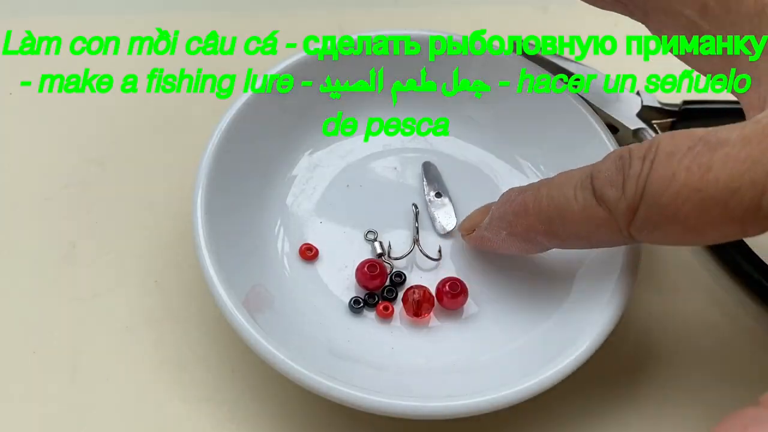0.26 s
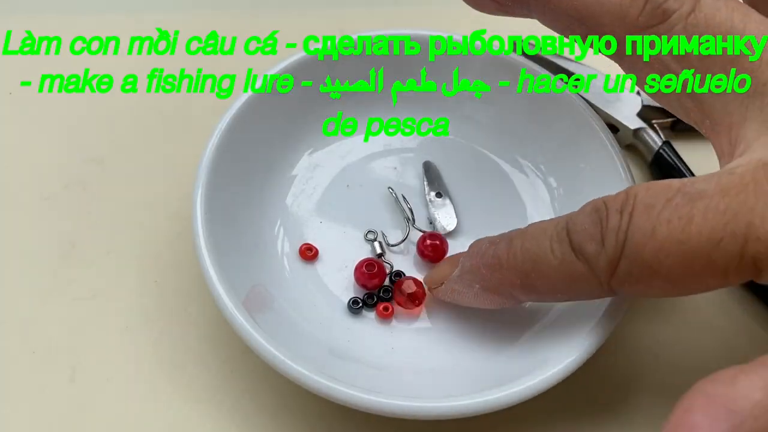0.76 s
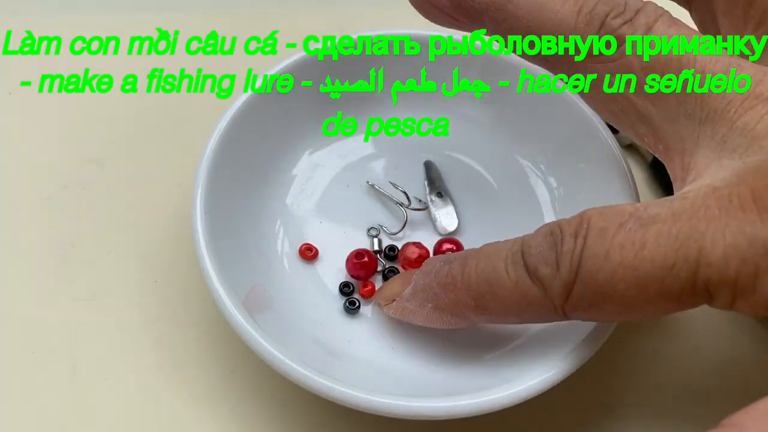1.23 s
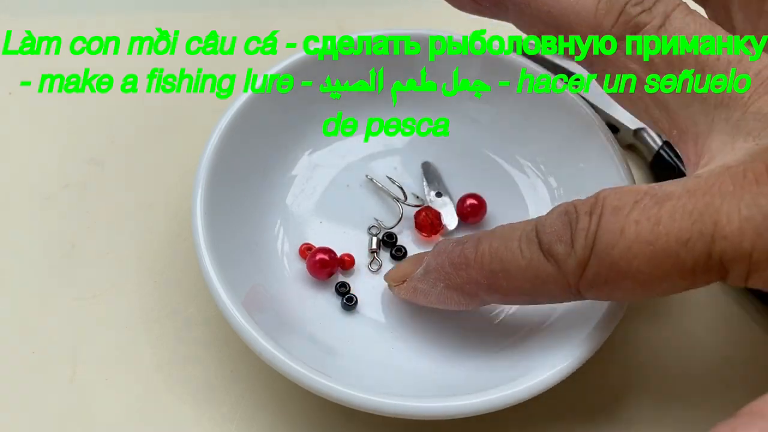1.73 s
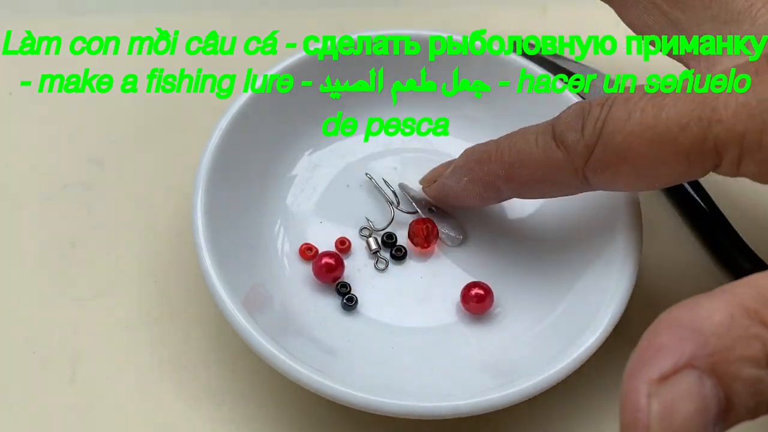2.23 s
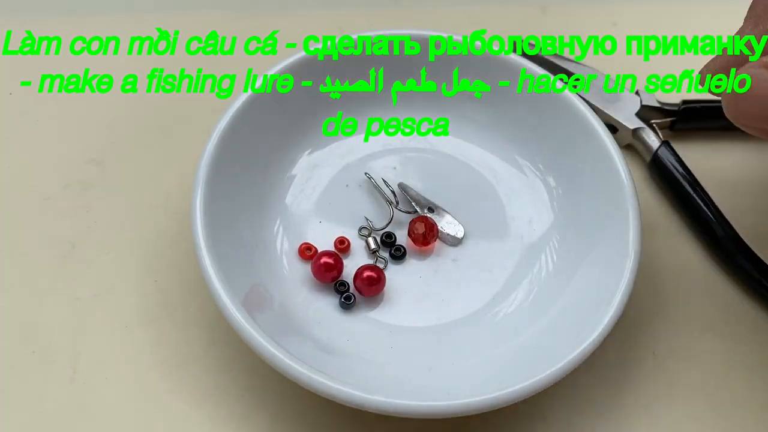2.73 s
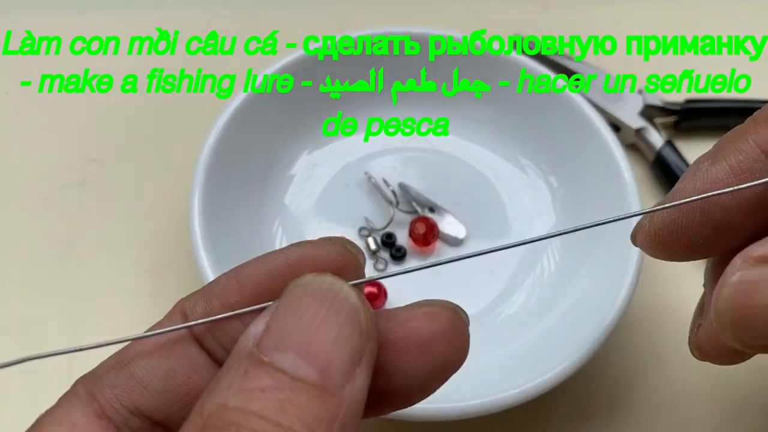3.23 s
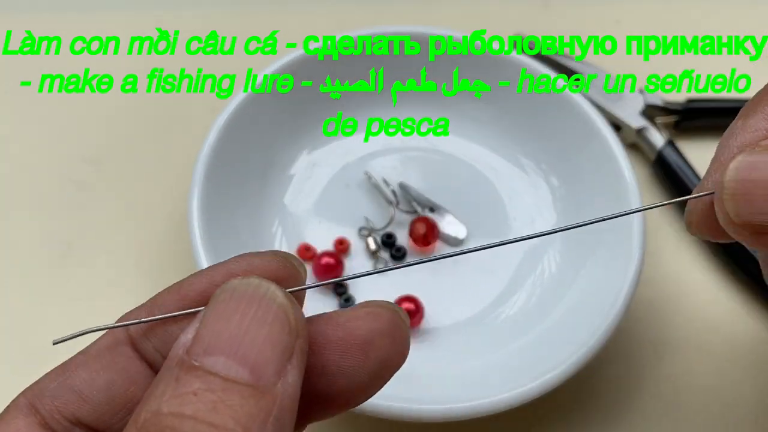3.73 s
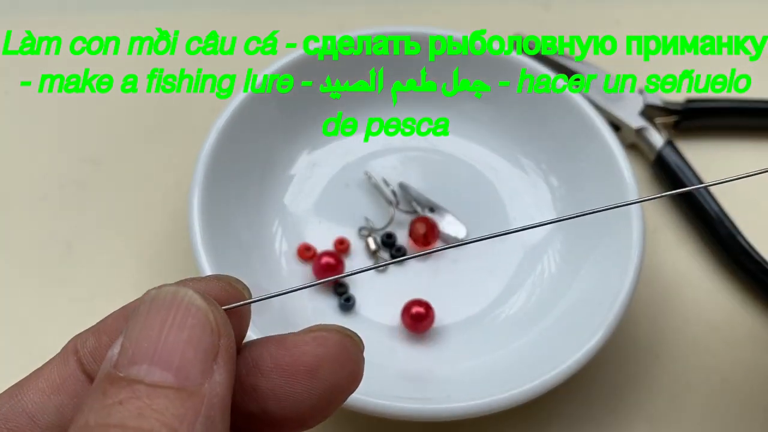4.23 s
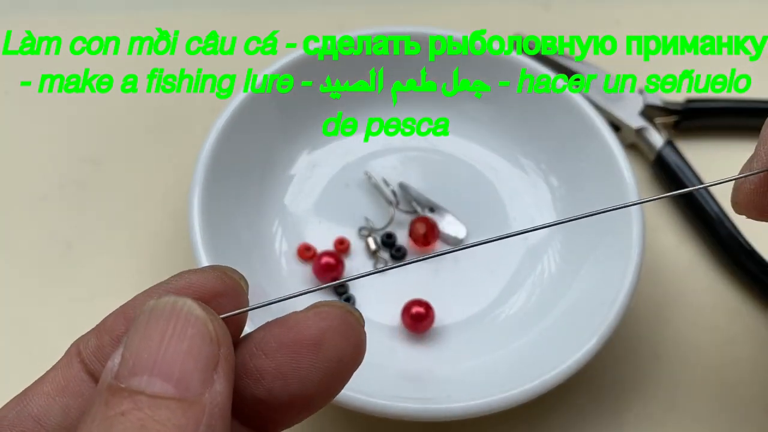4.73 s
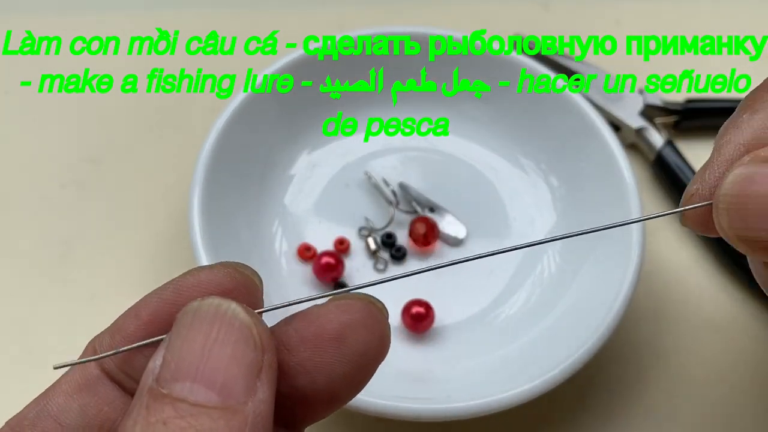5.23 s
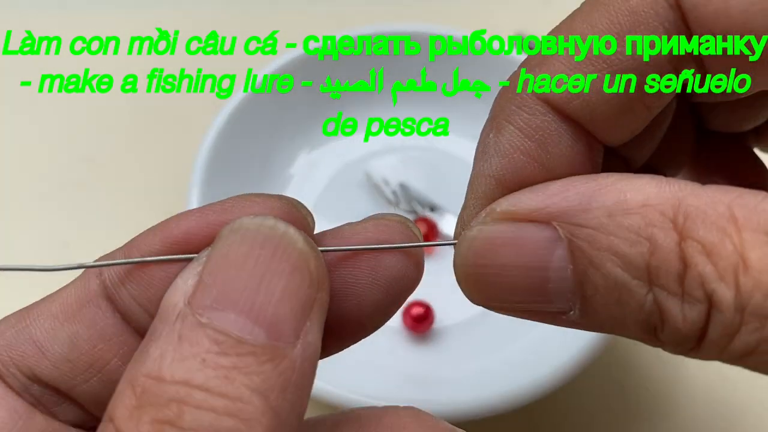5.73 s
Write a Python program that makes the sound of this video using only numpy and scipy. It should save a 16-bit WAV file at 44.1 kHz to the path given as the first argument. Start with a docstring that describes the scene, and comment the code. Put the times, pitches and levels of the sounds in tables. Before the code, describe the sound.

Close stereo phone pickup over a small china dish. A fan drones steadily with thin wavering electric whines and soft low air noise. Fingertip-nudged beads and hooks make tiny, bright, high ticks in clusters until about 2.3 seconds, the strongest near 1.3. Then a distant engine's low throb peaks around 3 seconds and fades, leaving only hum.

```python
"""A china dish under a phone with two microphone ports: a fingertip nudges beads, hooks and small metal blades.
Fan motor: sines on the orders of its shaft. Two electric drives: whining multiples that swell and dip.
Distant engine: low multiples of its cycle on one swell that rises and fades. Moving air: coloured noise.
Ticks: clicks, bounces and a fading rattle that ring the modes of the dish."""
import sys
import numpy as np
from scipy import signal
from scipy.fft import rfft, irfft
from scipy.io import wavfile

SR = 44100
rng = np.random.default_rng(int(sys.argv[2]) if len(sys.argv) > 2 else 0)


def bounce(signal):
    """Save signal as a 16-bit WAV file at the path given by the first command-line argument."""
    frames = np.transpose(np.atleast_2d(signal))
    limited = np.clip(frames, -1, 1)
    pcm = np.round(limited * 32767).astype(np.int16)
    wavfile.write(sys.argv[1], SR, pcm)


N = 262836
T_S = np.arange(N) / SR
BIN_HZ = np.maximum(np.arange(N // 2 + 1) * SR / N, 1.)


def undb(db):
    """Gain of a level in dB."""
    return 10 ** (np.asarray(db) / 20)


def on_log_hz(table, column):
    """Table column at every bin, linear in log frequency."""
    rows = np.array(table)
    return np.interp(np.log(BIN_HZ), np.log(rows[:, 0]), rows[:, column])


def in_time(curve):
    """Curve of (t, value) at every sample, joined by straight lines."""
    t_s, value = np.transpose(curve)
    return np.interp(T_S, t_s, value)


def walk(rate_hz):
    """Random values at rate_hz, joined by straight lines; spread near 1."""
    count = int(T_S[-1] * rate_hz) + 2
    knots = rng.standard_normal(count)
    return 1.24 * np.interp(T_S * rate_hz, np.arange(count), knots)


def tone(phase_rad, db, pan_db, lead_rad):
    """One sine at both ports from a random start phase; db is the mean power of the two."""
    start_rad = 2 * np.pi * rng.random()
    share = 2 / np.sqrt(1 + undb(np.array([[-2 * pan_db], [2 * pan_db]])))
    split_rad = np.array([[.5], [-.5]]) * lead_rad
    return undb(db) * share * np.sin(phase_rad + start_rad + split_rad)


# the two ports: f/Hz, likeness/0-1, left leads/rad, left minus right/dB
PORT_PAIR = [(30, .998, 0.0, -1.0), (129, 0.92, -0.02, 0), (292, 0.67, -0.9, -1), (418, 0.18, 1.9, -2),
             (690, 0.43, 3, 0), (1120, 0, 3.5, 0), (1500, 0.57, 4.5, -1), (2240, 0.35, 5.5, 3.5),
             (4030, 0.16, 7.5, 2.5), (6120, 0.51, 5.5, 4), (8050, 0.66, 3.5, 0), (11020, 1, -1.7, 0)]
TREBLE_LAG_S = 0.00025  # extra left lag above the last row


def ports(shared, apart=0):
    """Two spectra: the shared part takes the phase between the ports, both parts their balance."""
    above_hz = np.maximum(BIN_HZ - PORT_PAIR[-1][0], 0)
    lead_rad = on_log_hz(PORT_PAIR, 2) - 2 * np.pi * TREBLE_LAG_S * above_hz
    half = undb(on_log_hz(PORT_PAIR, 3) / 2)
    turned = shared * np.exp(.5j * np.array([lead_rad, -lead_rad]))
    return np.array([half, 1 / half]) * (turned + apart)


# low hum: f/Hz, level/dB, left minus right/dB, left leads/rad
HUM_LINE = (97.5, -44, -0.5, -0.5)


def hum():
    """One low line of fixed pitch; its level wavers."""
    hz, db, pan_db, lead_rad = HUM_LINE
    return tone(2 * np.pi * hz * T_S, db + 0.85 * walk(3.28), pan_db, lead_rad)


# fan shaft lines: order, level before trim/dB, left minus right/dB, left leads/rad
SHAFT_ORDERS = [(4, -51, 0, -0.0), (6, -50, -1, 0.0), (8, -54, -4, 0.2), (9, -51, 3, -0.1),
                (10, -51, 0, 0.0), (15, -56, 4, -0.1), (17, -57, 5, -0.5), (18, -49, -1, -0.3),
                (19, -44, -1, 0.7), (20, -52, -6, -0.0), (21, -51, -6, 0.4), (22, -53, 0, -2.6),
                (23, -54, -2, -2.8), (28, -60, 4, -2.6), (32, -62, -8, -1.3), (41, -59, 1, -2.4),
                (42, -56, -4, -2.9), (44, -61, 1, -2.7), (46, -57, 5, -2.0), (50, -61, 6, 2.9),
                (51, -55, -6, -3.1), (52, -63, 6, -1.7), (55, -64, -14, -2.6), (56, -59, 4, -1.3),
                (57, -63, 4, 0.3), (58, -67, 0, 1.4)]
# orders without a row above are faint: first order, stop order (excluded)
FAINT_RANGE = (30, 71)
SHAFT_HZ, SHAFT_TRIM_DB = 16.634, -.3
FAINT_DB, FAINT_DB_PER_ORDER, FAINT_SCATTER_DB = -65, -0.2, 3


def fan():
    """Fan motor: multiples of the shaft rate, wavering in level; the listed ones also in phase between ports."""
    shaft_rad = 2 * np.pi * SHAFT_HZ * T_S
    out = np.zeros((2, N))
    for k, db, pan_db, lead_rad in SHAFT_ORDERS:
        level_db = db + SHAFT_TRIM_DB + 1.17 * walk(5.0)
        out += tone(k * shaft_rad, level_db, pan_db, lead_rad + 0.23 * walk(1.985))
    listed = [row[0] for row in SHAFT_ORDERS]
    first, stop = FAINT_RANGE
    for k in range(first, stop):
        if k in listed:
            continue
        scatter_db, pan_db = FAINT_SCATTER_DB * rng.standard_normal(2)
        level_db = FAINT_DB + FAINT_DB_PER_ORDER * (k - first) + scatter_db
        out += tone(k * shaft_rad, level_db + 2 * walk(1.98), pan_db, np.pi + rng.standard_normal())
    return out


# whine lines: multiple, level before swell/dB, left minus right/dB, left leads/rad
LOW_LINES = [(1, -60.5, 9.5, 2), (3, -61, -2.5, -2), (4, -59.5, -0.5, 1.04), (6, -71.5, -7, 1.1)]
HIGH_LINES = [(2, -56.5, -4, 0.046), (3, -72, 9, 1.07), (4, -67.5, -0.5, 0.84)]
# swells and dips of the strong lines, (drive, multiple) -> t/s, gain/dB
LINE_SWELLS = {("low", 3): [(0, -2), (2.2, -0.5), (2.95, 4.5), (3.4, 2), (3.7, 4.5), (4.5, -2), (5.96, -3)],
               ("low", 4): [(0, 3.5), (.5, -1.5), (1.2, -2.5), (2.1, -7.5), (2.9, 1.5), (4, 3.5), (4.4, -1),
               (5, 2.5), (5.96, -3)], ("high", 2): [(0, -10), (.42, -8), (.58, -0.5), (.88, -1), (.95, -7),
               (1.3, -10), (1.45, 1), (1.7, 0), (2.3, 2.5), (2.75, -0.5), (2.9, -14), (3.55, -6), (4, -5),
               (4.25, -12), (4.5, -2.5), (4.9, -9), (5.3, -13), (5.45, -3), (5.65, -11), (5.96, -6)],
               ("high", 3): [(0, 0.5), (1.3, -2), (1.6, 3), (2.7, -2), (3.2, 0), (3.95, -4), (4.2, 10),
               (4.9, 8), (5.3, 2.5), (5.96, 5)], ("high", 4): [(0, -17), (.22, 5), (.42, -3), (.65, 3),
               (1.35, 2), (1.65, 6), (2.7, 5), (2.78, -7), (4.65, -7.5), (4.85, 0.5), (5.1, -7), (5.75, -3),
               (5.85, 3.5), (5.96, 4)]}
# lead added to high multiple 2, which wanders between the ports: t/s, left leads/rad
HIGH_2_TURN = [(.2, -.6), (.8, -1), (1.2, 1.15), (2.5, 1.5), (3.5, 4), (4.4, 5), (4.8, 6.5), (5.96, 6)]
LOW_WHINE_HZ, HIGH_WHINE_HZ = 517.95, 1151.1
LOW_FLICKER_DB, HIGH_FLICKER_DB = 1.2, 1.7


def drive(name, base_hz, lines, flicker_db):
    """Electric drive: multiples of one fixed pitch that flicker; the strong ones swell and dip."""
    out = np.zeros((2, N))
    for k, db, pan_db, lead_rad in lines:
        k = round(k)
        if (name, k) in LINE_SWELLS:
            db = db + in_time(LINE_SWELLS[name, k])
        if (name, k) == ("high", 2):
            lead_rad = lead_rad + in_time(HIGH_2_TURN)
        out += tone(2 * np.pi * k * base_hz * T_S, db + flicker_db * walk(12.0), pan_db, lead_rad)
    return out


def drives():
    """The low and the high whine."""
    low = drive("low", LOW_WHINE_HZ, LOW_LINES, LOW_FLICKER_DB)
    return low + drive("high", HIGH_WHINE_HZ, HIGH_LINES, HIGH_FLICKER_DB)


# engine cycle rate: t/s, f/Hz
CYCLE_RATE = [(0, 21.5), (2.6, 21.5), (3.4, 21), (4.1, 20.5), (5.96, 20.5)]
# engine swell: t/s, level/dB
SWELL = [(0, -19.5), (.7, -11.5), (1.2, -13.5), (1.75, -8), (2.55, -7.5), (2.8, 3), (3.2, 2.5), (3.65, -5),
         (4.15, -2.5), (4.5, -12), (5.96, -24)]
# engine lines: multiple, level before swell and drift/dB, share of swell (about 0-1), drift/(dB/s)
CYCLE_ORDERS = [(4, -52, 0.03, -1.5), (5, -42, 0.74, 2), (6, -35, 1.03, -1.8), (7, -44, 1, -4.5),
                (8, -44.5, 0.43, 0)]
DRIFT_ZERO_S = 3
ENGINE_PAN_DB, ENGINE_LEAD_RAD = -1.7, 0.066


def engine():
    """Low multiples of the firing cycle on one swell; each follows it in its own measure and flickers."""
    cycle_rad = 2 * np.pi * np.cumsum(in_time(CYCLE_RATE)) / SR
    swell_db = in_time(SWELL)
    out = np.zeros((2, N))
    for k, db, share, drift_db_per_s in CYCLE_ORDERS:
        level_db = db + share * swell_db + drift_db_per_s * (T_S - DRIFT_ZERO_S)
        out += tone(round(k) * cycle_rad, level_db + 0.99 * walk(4.08), ENGINE_PAN_DB, ENGINE_LEAD_RAD)
    return out


# moving air and microphone hiss, before drift and port balance: f/Hz, level/(dB per Hz)
AIR_SPECTRUM = [(24, -95), (41, -71.5), (60, -65.5), (100, -59.5), (140, -66), (163, -56.5), (190, -64),
                (230, -66.5), (330, -64.5), (600, -74.5), (1200, -82.5), (2000, -89), (3500, -93.5),
                (6500, -96.5), (9200, -101), (12000, -112), (13300, -115), (14600, -110), (15600, -111),
                (15900, -132)]
AIR_FADE_DB_PER_S = -0.22


def air():
    """Noise coloured by a spectrum, partly alike at the ports; it drifts gently and thins with time."""
    like = np.clip(on_log_hz(PORT_PAIR, 1), 0, 1)
    white = rfft(rng.standard_normal((3, N)))
    both = ports(np.sqrt(like) * white[0], np.sqrt(1 - like) * white[1:])
    colour = undb(on_log_hz(AIR_SPECTRUM, 1)) * np.sqrt(SR / 2)  # unit noise to 0 dB per Hz
    drift_db = 0.15 * walk(1.43) + AIR_FADE_DB_PER_S * (T_S - T_S.mean())
    return irfft(both * colour, N) * undb(drift_db)


# touches: t/s, drive level/dB, piece, hops after it (where the piece bounces)
TOUCHES = [(0.0682, -42, "swivel"), (0.0798, -47, "bead"), (0.083, -46, "hook"), (0.0935, -48, "swivel", 1),
           (0.1281, -53, "swivel"), (0.1464, -54, "swivel"), (0.158, -52, "swivel", 2),
           (0.737, -47, "wire"), (0.7505, -56, "blade"), (0.7545, -48, "eyelet"), (0.79, -44, "swivel"),
           (0.68, -53, "swivel", 4), (1.1682, -54, "eyelet"), (1.184, -53, "swivel"),
           (1.1925, -52, "eyelet"), (1.1985, -43.5, "blade"), (1.2113, -41, "blade"),
           (1.2214, -42, "blade", 1), (1.4, -47, "swivel"), (1.2723, -30, "bead"), (1.2834, -46, "barb"),
           (1.295, -34, "bead"), (1.3042, -39, "bead"), (1.3119, -32.5, "bead"), (1.3258, -34.5, "bead"),
           (1.343, -36, "bead"), (1.3494, -48, "wire"), (1.7247, -34.5, "hook"), (1.73, -41, "hook"),
           (1.7814, -60, "eyelet"), (1.8462, -50, "eyelet"), (2.2, -48, "eyelet"),
           (1.9744, -46.5, "swivel"), (2.1345, -56, "wire"), (2.1495, -44, "hook"),
           (2.1567, -44.5, "bead", 1), (2, -50, "hook"), (2.1884, -56, "wire", 1), (2.3416, -55, "bead")]
# piece -> drive/dB of the low pair of modes, of each of three upper modes, of the bare contact
PIECE_COLOURS = {"bead": (0, -29, -30, -30, -10), "swivel": (0, -12, -24, -22, 1),
                 "blade": (-2, -2.5, -14, -8, 12), "eyelet": (-0.5, -2, -20, -18, 5),
                 "hook": (0, -18, -16, -3, 7), "barb": (-20, -25, 0, -8, 0),
                 "wire": (-10, -20, -12, -8, 19)}
HOP_S, HOP_DB = .012, -2  # mean gap, level step per hop
BOUNCE_SPAN_S, BOUNCE_MAX = .006, .2
TOUCH_SCATTER_DB = 2.5  # either way


def blows():
    """Impulses on five drives: each touch or hop is a click and five smaller bounces of random sign."""
    out = 1e-15 * rng.standard_normal((5, N))  # keeps the filters off denormals
    for t_s, db, piece, *hops in TOUCHES:
        for hop in range(round(sum(hops)) + 1):
            when, strength = rng.random((2, 5))
            hop_s = hop * HOP_S * (1 + .3 * (rng.random() - .5))
            hit_s = t_s + hop_s + np.r_[0, BOUNCE_SPAN_S * when]
            size = np.r_[1, BOUNCE_MAX * strength * np.sign(when - .5)]
            scatter_db = 2 * TOUCH_SCATTER_DB * (rng.random(5) - .5)
            drive_db = db + hop * HOP_DB + np.array(PIECE_COLOURS[piece]) + scatter_db
            out[:, (hit_s * SR).astype(int)] += undb(drive_db[:, None]) * size
    return out


RATTLE_PER_S, RATTLE_DB, RATTLE_S = 3500, -22, .008  # RATTLE_S: decay to 1/e


def rattle(hits):
    """Tiny rolling contacts: sparse random impulses that die away after each hit."""
    stirred = signal.lfilter([1], [1, -np.exp(-1 / (RATTLE_S * SR))], np.abs(hits))
    contact = rng.random(N) < RATTLE_PER_S / SR
    return undb(RATTLE_DB) * stirred * rng.standard_normal(N) * contact


# bare contact: f/Hz, width/Hz, level/dB
CONTACT_BANDS = [(10000, 3600, 1), (15300, 2500, 1)]
CONTACT_RATTLE_DB = 7.0


def contact(drive_signal):
    """Bare contact: broad two-pole band-passes."""
    out = np.zeros(N)
    for hz, width_hz, db in CONTACT_BANDS:
        b, a = signal.iirpeak(hz, hz / width_hz, fs=SR)
        out += undb(db) * signal.lfilter(b, a, drive_signal)
    return out


# dish modes: f/Hz, level/dB, t60/s
DISH_MODES = [(8750, 1, .034), (9300, -11.5, .02), (13170, -1, .034), (14240, 0, .022), (14650, -1, .011)]


def dish(drives_in):
    """China modes: each drive rings a decaying two-pole resonator."""
    out = np.zeros(N)
    for (hz, db, t60_s), drive_signal in zip(DISH_MODES, drives_in):
        r = np.exp(-np.log(1000) / (t60_s * SR))
        w = 2 * np.pi * hz / SR
        out += undb(db) * signal.lfilter([0, np.sin(w)], [1, -2 * r * np.cos(w), r * r], drive_signal)
    return out


TICK_GAIN_DB, RADIATE_HZ = 3.0, 7000


def ticks():
    """Touches and their rattle sound as bare contact and dish; such small things radiate only treble."""
    hits = blows()
    rolling = rattle(hits)
    out = contact(hits[-1] + undb(CONTACT_RATTLE_DB) * rolling[-1])
    driven = hits + rolling
    out += dish(driven[[0, 0, 1, 2, 3]])  # the low pair shares a drive
    treble = 1 / np.sqrt(1 + (RADIATE_HZ / BIN_HZ) ** 6)
    return irfft(ports(undb(TICK_GAIN_DB) * treble * rfft(out)), N)


def scene():
    """Everything at the two ports."""
    return hum() + fan() + drives() + engine() + air() + ticks()


TOP_HZ = 15950


def record(dry):
    """The phone cuts the top: steep elliptic low-pass."""
    sos = signal.ellip(10, .2, 80, TOP_HZ, fs=SR, output="sos")
    return signal.sosfilt(sos, dry)


dry = scene()
out = record(dry)
bounce(out)
```